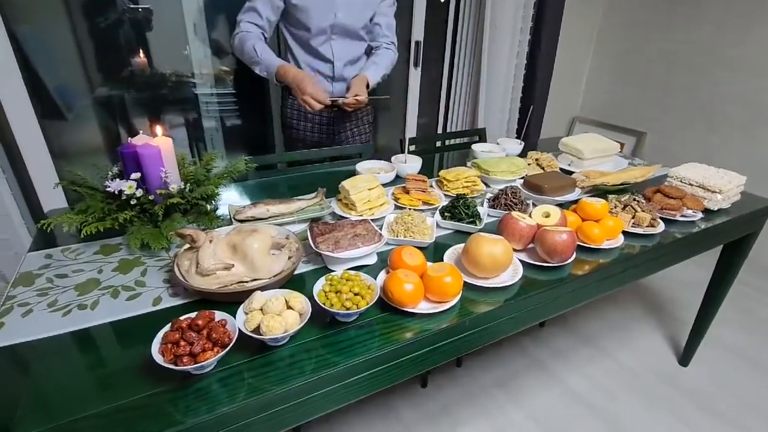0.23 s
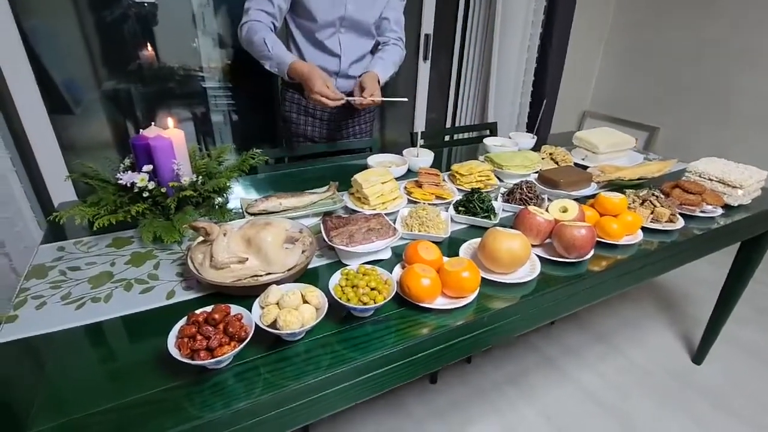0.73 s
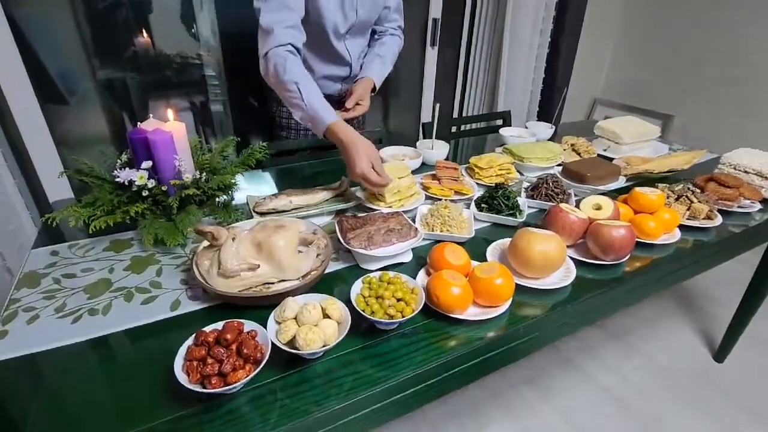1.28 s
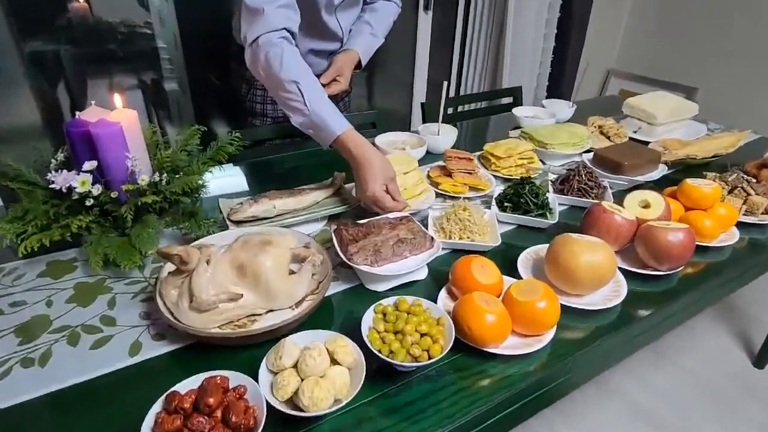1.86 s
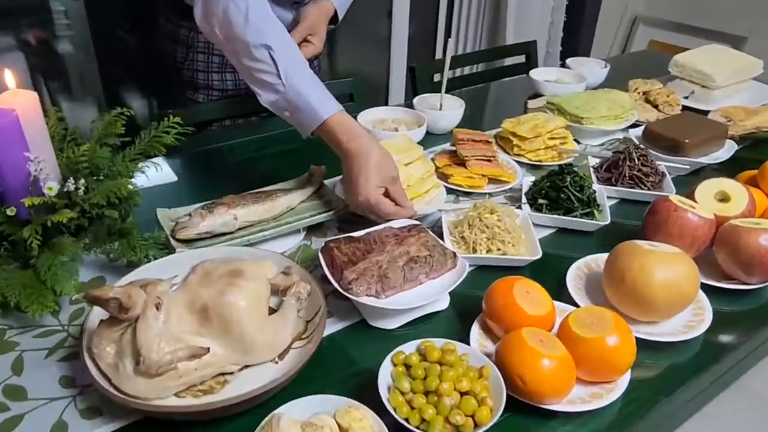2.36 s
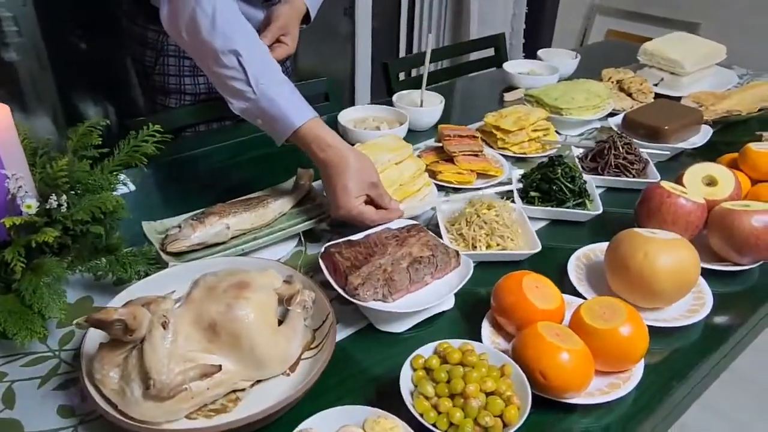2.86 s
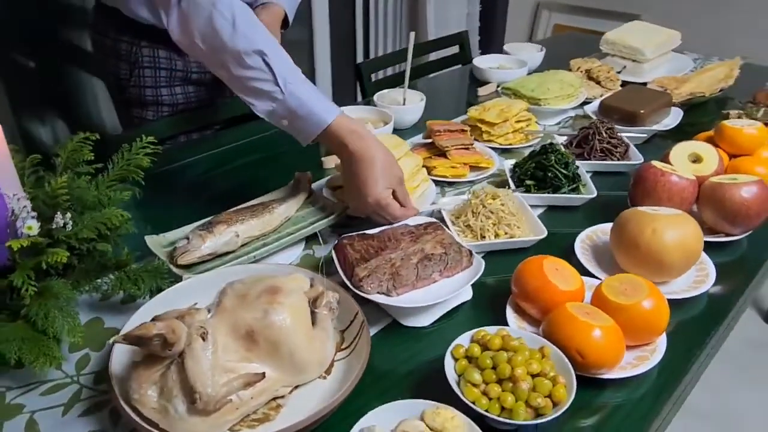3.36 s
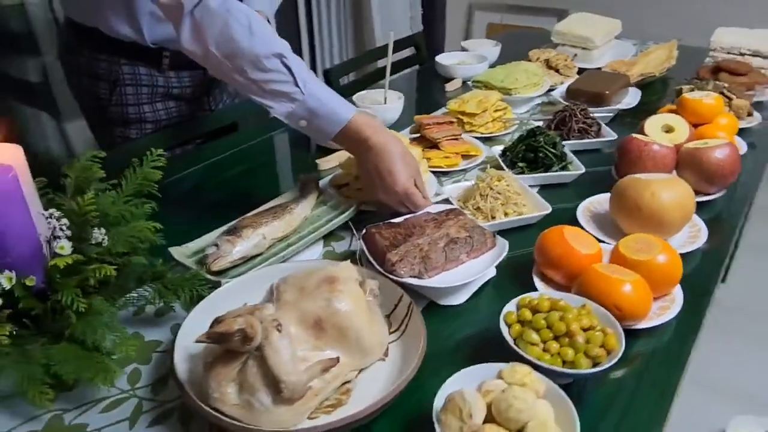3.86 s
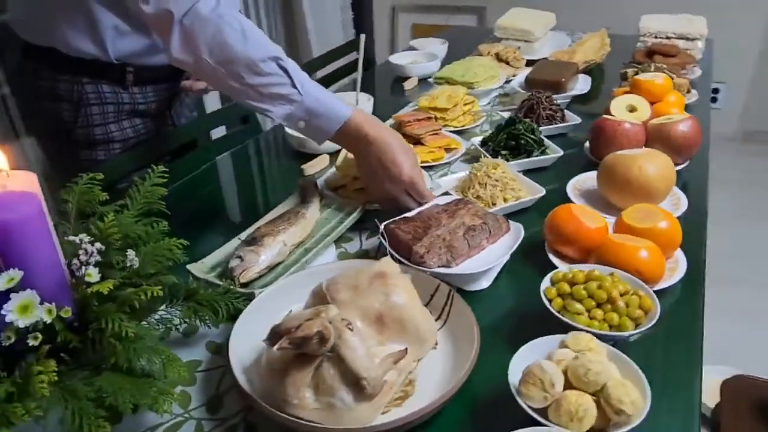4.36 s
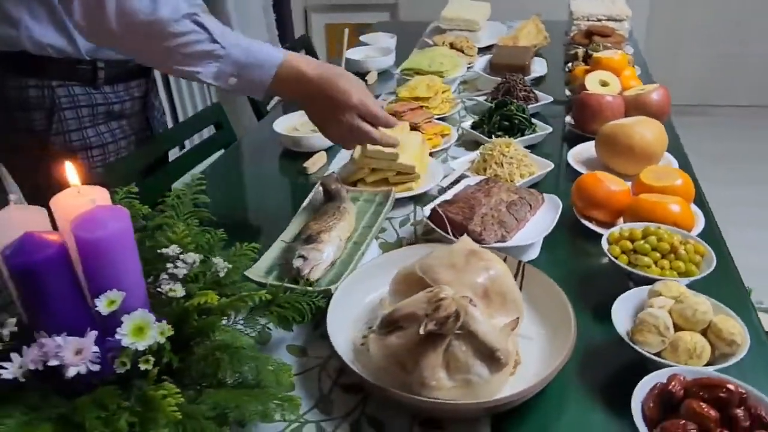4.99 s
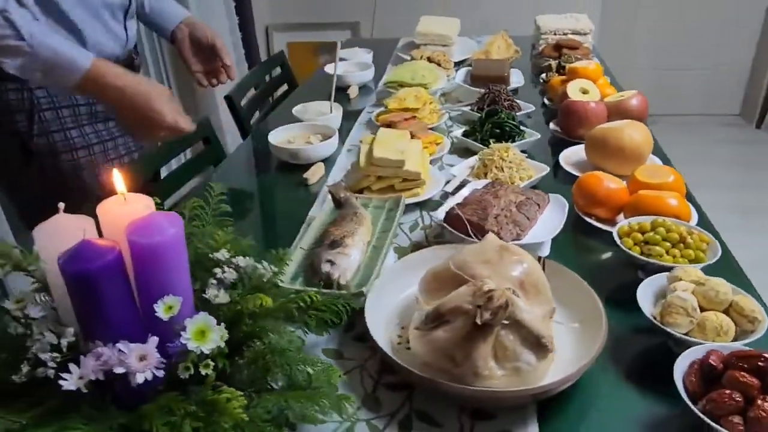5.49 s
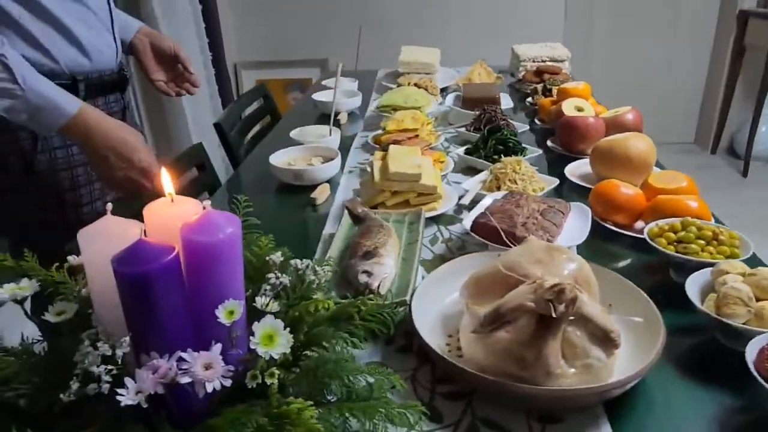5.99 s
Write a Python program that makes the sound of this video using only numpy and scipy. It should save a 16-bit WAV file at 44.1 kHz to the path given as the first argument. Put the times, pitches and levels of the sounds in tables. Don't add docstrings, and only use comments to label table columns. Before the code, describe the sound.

A quiet indoor room with low fridge hum, picked up by a hand-held phone about two metres from a table. Soft handling bumps and cloth swishes come first, then light chopstick clinks on china, one much louder clack with a quick rattle near three seconds, several smaller wooden taps and clinks, and finally rustling of sleeves and slippers.

```python
import sys
import numpy as np
from scipy import signal
from scipy.io import wavfile
from scipy.ndimage import uniform_filter1d, minimum_filter1d

SR = 44100
rng = np.random.default_rng(int(sys.argv[2]) if len(sys.argv) > 2 else 0)


def magnitude_from_level(level_db):
    exponent = np.asarray(level_db, float) / 20
    return 10 ** exponent


def dump_mix(stems):
    frames = np.atleast_2d(stems).T
    limited = np.clip(frames, -1, 1)
    pcm = np.round(limited * 32767).astype(np.int16)
    wavfile.write(sys.argv[1], SR, pcm)


N = 274743


def level(x, db):
    return x * magnitude_from_level(db) / np.sqrt(np.mean(x ** 2))


def band(x, lo_hz, hi_hz):
    return signal.sosfilt(signal.butter(2, [lo_hz, min(hi_hz, .45 * SR)], "band", fs=SR, output="sos"), x)


def on_log(table, hz):
    return np.interp(np.log(hz), np.log([row[0] for row in table]), [row[1] for row in table])


def walk(rate_hz):
    k = int(SR / rate_hz)
    x = np.repeat(rng.standard_normal(N // k + 1), k)
    x = uniform_filter1d(uniform_filter1d(x, k), k)[:N]
    return x / x.std()


def pan_gain(pan_db):
    return magnitude_from_level(np.array([[pan_db], [-pan_db]]) / 2)


def pair(hz, alike_hz, size=N):
    mid, side = rng.standard_normal((2, size))
    share = np.clip(hz / alike_hz, .21, 1)
    return (mid + share * side * np.array([[1], [-1]])) / np.sqrt(1 + share ** 2)


def ring(hz, db, t60_s, turn=0, start=0, rise_s=0.00056):
    t = np.arange(int((np.max(t60_s) + .02) * SR))[:, None] / SR
    decay = np.exp(-np.log(1000) * t / t60_s)
    fade = magnitude_from_level(db) * decay * (1 - np.exp(-t / rise_s))
    phase = 2 * np.pi * hz * t + start
    return np.array([np.sum(fade * np.sin(phase + side * turn), axis=1) for side in (.5, -.5)])


def add(out, start_s, x, pan_db):
    i = int(start_s * SR)
    x = x[:, :N - i] * pan_gain(pan_db)
    out[:, i:i + x.shape[1]] += x


def chatter(x, span_s, drop_db):
    when, weaker = rng.random((2, 7))
    push = np.zeros((1, int(span_s * SR) + 2))
    push[0, (when * span_s * SR).astype(int)] = magnitude_from_level(drop_db - 14 * when - 2 * weaker)
    push[0, 0] = 1
    return signal.fftconvolve(x, push)


# freq [Hz], density [dB per Hz]
AIR_TONE = [(15, -34), (25, -6), (59, -2.5), (82, -21), (113, -11.5), (267, -11), (340, -17.5),
            (523, -17.5), (2170, -24), (2630, -30), (4150, -31), (7500, -35.5), (15500, -50)]
# freq [Hz], level [dB], width [Hz]
CASE_DRONE = [(61, -73.5, 17), (343, -70.5, 64), (810, -92, 56.2), (2130, -78.5, 280)]


def air():
    tone, t = 0, np.arange(N) / SR
    for hz in 28 * 2 ** np.arange(0, 9.1, .5):
        db = on_log(AIR_TONE, hz) + 1.5 * walk(3)
        tone = tone + magnitude_from_level(db) * band(pair(hz, 1000), hz / 1.153, hz * 1.142)
    drone = 0
    for hz, level_db, width_hz in CASE_DRONE:
        drone = drone + level(band(pair(hz, 1050), hz - width_hz / 2, hz + width_hz / 2), level_db)
    hum_db, hum_hz = -61 + 1.8 * walk(8.8), 59.7
    hum = magnitude_from_level(hum_db) * np.sin(2 * np.pi * hum_hz * t + walk(2.72))
    return level(tone, -65) + drone + hum


# fastest_s [s], rise_s [s], fall_s [s], level_db [dB], bright_db [dB]
STROKES = [(0.03, .2, 0.7, -71.5, 1), (0.28, 0.033, 0.16, -71, -5.5), (0.385, .12, 0.06, -64.5, -1.5),
           (0.969, 0.21, 0.54, -72, 3.5), (1.3, 0.4, 1, -72, -3.5), (1.255, .03, 0.043, -71.5, 20),
           (5.09, 0.18, 0.31, -75.5, -4.5), (1.587, 0.091, .11, -53, 3.5), (2.12, 0.2, 0.13, -82.5, -16.5),
           (3.225, 0.21, 0.24, -67.5, -5), (3.61, 0.059, .12, -60.5, -2.5), (3.72, 0.16, 0.45, -70, -3),
           (3.97, 0.043, 0.057, -60.5, 1.5), (4.385, 0.029, 0.082, -61, 16), (4.427, 0.047, 0.077, -61, -6),
           (4.882, 0.095, 0.15, -60.5, 5), (4.938, .1, .11, -52, 14.5), (4.7, .1, 0.14, -74.5, -1.5),
           (5.374, 0.056, .1, -57.5, 1), (5.5, 0.23, 0.3, -68, -2.5), (5.63, 0.17, 0.16, -64.5, -5.5),
           (5.755, 0.058, 0.15, -62, 1.5), (5.98, 0.32, 0.24, -71.5, -4.5), (6.129, 0.058, .13, -48, 6.5)]


def swish():
    body_db, sizzle_db, sizzle_slope = 0.5, -4.5, 0.29
    curve = 1.39
    out, power, t = np.zeros((2, N)), np.zeros((3, N)), np.arange(N) / SR
    slips = magnitude_from_level(1.5 * rng.exponential(size=N) + 2.38 * walk(40))
    for fastest_s, rise_s, fall_s, level_db, bright_db in STROKES:
        near = slice(max(int((fastest_s - 2 * rise_s) * SR), 0), int((fastest_s + 2 * fall_s) * SR))
        after_s = t[near] - fastest_s
        away = np.where(after_s < 0, -after_s / rise_s, after_s / fall_s)
        tilt_db = np.array([[body_db - bright_db], [0], [sizzle_db + sizzle_slope * bright_db]])
        power[:, near] += magnitude_from_level(level_db + 1.0 + tilt_db - 20 * away ** curve) ** 2
    for (hz, k), gain in zip(((1400, 1.98), (4500, 1.85), (11000, 1.4)), np.sqrt(power)):
        out += level(band(pair(hz, 1670) * slips, hz / k, hz * k), 0) * gain
    return out * pan_gain(1.5)


# start_s [s], peak_db [dB], pitch_hz [Hz], t60_s [s], edge_db [dB]
FINGER_BUMPS = [(0.385, -31, 52, 0.011, -7), (0.631, -50, 61.6, 0.054, -20), (0.858, -49, 55.7, 0.16, -25),
                (0.927, -39.5, 65, 0.023, -30), (3.62, -77, 51.1, 0.07, -11), (3.65, -51.5, 64, 0.45, -14),
                (3.754, -41, 65, 0.04, -23), (4.771, -48.5, 64.5, 0.059, -5),
                (4.827, -47, 60.9, 0.14, -9.5), (5.374, -36, 53.8, 0.021, -29),
                (5.393, -39.5, 87, 0.06, -29), (5.657, -48, 64.5, 0.018, 1)]


def bumps():
    out = np.zeros((2, N))
    for start_s, peak_db, pitch_hz, t60_s, edge_db in FINGER_BUMPS:
        thump = ring(np.array([pitch_hz, 320]), peak_db + np.array([3, edge_db]), np.array([t60_s, .012]))
        add(out, start_s, thump, 0)
    return out


# start_s [s], peak_db [dB], pitch_hz [Hz], t60_s [s],
# pan_db [left minus right dB]
DRY_TICKS = [(0.625, -63, 450, 0.2, -1), (1.374, -40, 1640, 0.012, 9.5), (1.6604, -40, 1300, 0.0058, 7),
             (1.784, -42.5, 1700, 0.013, 12), (2.49, -62, 656, 0.087, .6), (2.575, -49, 334, 0.043, .6),
             (3.31, -50, 334, 0.057, 1), (3.483, -48, 336, 0.09, 2), (3.51, -52.5, 303, 0.088, .6),
             (4.279, -54, 330, 0.036, 3), (4.965, -61, 467, 0.09, 4), (5.3095, -49, 1660, 0.018, 7.5),
             (5.6442, -38, 1880, 0.0079, 11), (5.79, -60.5, 847, 0.09, 3)]


def ticks():
    out = np.zeros((2, N))
    for start_s, peak_db, pitch_hz, t60_s, pan_db in DRY_TICKS:
        tick = ring(pitch_hz * np.array([1, 1.25]), peak_db + np.array([3.5, -7]), t60_s)
        add(out, start_s, tick, pan_db)
    return out


# start_s [s], peak_db [dB], low_db, high_db, rebound_db [dB above peak]
CHINA_HITS = [(1.7245, -44, -11.5, 8.5, -28), (1.823, -56, -7, 11, 4), (1.8414, -37.5, -23, 9, -4.5),
              (1.8497, -35.5, 2, 9, -22), (1.914, -41, 4, 8, -31), (2.1271, -58.5, -10, -20, -1.5),
              (2.2578, -50, -3, -6, -14), (2.5566, -56, 2, -3.5, -11), (2.6412, -40, -11.5, 4.5, -20),
              (2.83, -52, -2.5, -3.5, -13.5), (2.97, -12.5, -25, 0, -15), (2.9864, -29, -1.5, 13.5, -4.5),
              (3.8173, -35, -11, -8, -25), (4.0544, -31, -7, 1, 1.5), (4.4227, -50.5, -14.5, -4, 0),
              (4.5471, -38, -10, -0.5, -7.5)]
PLATE_HZ = [3020, 3110, 3220, 3850, 4300, 4420, 4610, 4890, 5760, 5900, 6260, 6550, 7650, 8010, 8180, 8810,
            9480, 10450, 10900, 11300, 11850, 12320, 13300, 13620, 14380, 14850, 15050]
PLATE_DB = [7.5, -3, 8, -9, 4.5, -1.5, -15.5, -23, -7, -8, -12, -9, -5, -4, -9.5, -6.5, -3.5, -6.5, -7.5,
            -0.5, 0, -1.5, -6.5, -16, -12.5, -7.5, -9]
PLATE_EDGES_HZ = (3600, 5200, 10100)
TABLE_PAN_DB = 2


def clinks():
    out, hz = np.zeros((2, N)), np.array(PLATE_HZ)
    group = np.searchsorted(PLATE_EDGES_HZ, hz)
    for start_s, peak_db, low_db, high_db, rebound_db in CHINA_HITS:
        blend_odd, pitch_odd, turn_odd, phase_odd = rng.standard_normal((4, len(hz)))
        top_db = 1.24 * high_db - 7.5
        group_db = np.array([low_db, 0, high_db - 3, top_db - 3])[group]
        blend_db = peak_db - 1.5 + np.array(PLATE_DB) + group_db + 0.59 * blend_odd
        tone = ring(hz * (1 + 0.008 * pitch_odd), blend_db, t60_s=0.038, turn=1.54 * turn_odd,
                    start=np.pi * phase_odd, rise_s=.0011)
        add(out, start_s, chatter(tone, span_s=0.055, drop_db=rebound_db), TABLE_PAN_DB)
    return out


# pitch_hz [Hz], level_db [dB], t60_s [s]
WOOD_MODES = [(580, 7, 0.011), (734, -25, 0.023), (801, 2.5, 0.019), (935, -12, 0.014),
              (1140, 11.5, 0.0074), (1430, 1, 0.029), (1695, 10, 0.0035), (2072, 6, 0.025),
              (2259, 2.5, 0.028), (2678, 11.5, 0.0037), (3150, -4, 0.0069)]


def wood_blow(peak_db, best_hz, crack_db, rebound_db):
    hz, mode_db, t60_s = np.transpose(WOOD_MODES)
    pitch_odd, turn_odd, phase_odd = rng.standard_normal((3, len(hz)))
    blend_db = peak_db - 2.5 + mode_db - 7 * np.abs(np.log2(hz / best_hz))
    tone = ring(hz * (1 + 0.038 * pitch_odd), blend_db, t60_s, turn=turn_odd * hz / 2500,
                start=np.pi * phase_odd, rise_s=0.00038)
    crack = band(pair(6000, 4000, size=800), 1200, 7000) * np.exp(-np.arange(800) / (0.009 * SR))
    tone[:, :800] += crack * magnitude_from_level(peak_db + crack_db)
    return chatter(tone, span_s=.05, drop_db=rebound_db)


# start_s [s], peak_db [dB], best_hz [Hz], crack_db, rebound_db [dB above peak]
HARD_KNOCKS = [(1.725, -44.5, 1000, -1, -13), (1.841, -47, 960, -4, 3), (1.85, -38.5, 2130, 5, -25),
               (1.916, -40.5, 900, 6, -19), (2.259, -56.5, 830, 8.5, -28), (2.613, -47, 1470, -4.5, -6),
               (2.639, -51.5, 1010, 10.5, -15), (2.97, -22.5, 1070, 1, -8), (3.015, -27.5, 1430, 6, -17),
               (3.483, -34, 637, -8, -25.5), (3.816, -38, 560, 4, -12.5), (4.052, -36.5, 810, 9.5, 3.5),
               (4.063, -40, 765, 8, -2.5), (4.545, -43.5, 1140, 0, -2), (4.574, -45, 1220, 0.5, -5)]


def knocks():
    out = np.zeros((2, N))
    for start_s, peak_db, best_hz, crack_db, rebound_db in HARD_KNOCKS:
        add(out, start_s, wood_blow(peak_db, best_hz, crack_db, rebound_db), TABLE_PAN_DB)
    return out


# start_s [s], level_db [dB]
HAND_THUDS = [(1.725, -60.5), (1.841, -50.5), (1.917, -59.5), (1.963, -63), (2.64, -62), (2.97, -40.5),
              (3.016, -46.5), (3.37, -67), (3.483, -56.5), (3.816, -65), (4.038, -50.5), (4.277, -66),
              (4.475, -63.5), (4.543, -56)]
# pitch_hz [Hz], level_db [dB], t60_s [s]
TABLE_MODES = [(146.5, 5.5, 0.15), (173.3, 9.5, 0.12), (208.4, -2, 0.42), (318, -4, 0.039)]


def thuds():
    out = np.zeros((2, N))
    hz, mode_db, t60_s = np.transpose(TABLE_MODES)
    for start_s, level_db in HAND_THUDS:
        add(out, start_s, ring(hz, level_db - 6 + mode_db, t60_s, rise_s=0.0088), 0)
    return out


# start_s [s], peak_db [dB], best_hz [Hz]
SOFT_TAPS = [(1.963, -45.5, 560), (2.492, -64, 650), (2.572, -48.5, 1300), (2.714, -55.5, 795),
             (2.986, -29.5, 1000), (3.308, -53, 619), (3.371, -51.5, 900), (3.789, -46.5, 1430),
             (3.884, -42.5, 570), (4.038, -47, 1020), (4.278, -49.5, 635), (4.405, -50.5, 1380),
             (4.475, -41.5, 550)]


def taps():
    out = np.zeros((2, N))
    for start_s, peak_db, best_hz in SOFT_TAPS:
        add(out, start_s, wood_blow(peak_db, best_hz, crack_db=-12, rebound_db=-10), TABLE_PAN_DB)
    return out


# start_s [s], peak_db [dB], middle_hz [Hz], pan_db [left minus right dB]
WIDE_SNAPS = [
    (4.5679, -30.5, 10900, 1),
    (4.6429, -33.5, 6100, 3),
    (5.066, -44, 6700, -1),
]


def snaps():
    out = np.zeros((2, N))
    for start_s, peak_db, middle_hz, pan_db in WIDE_SNAPS:
        click = pair(middle_hz, 9000, size=400) * np.exp(-np.arange(400) / (0.002 * SR))
        add(out, start_s, band(click, middle_hz / 1.9, middle_hz * 1.18) * magnitude_from_level(peak_db + 1.0), pan_db)
    return out


# freq [Hz], t60 [s]
DECAY_T60 = [(150, 0.61), (600, 0.36), (2000, 0.37), (5000, 0.2), (14000, 0.25)]


def echoes(wet_db, build_s):
    t, tail = np.arange(SR // 2) / SR, 0
    for hz in 60 * 2. ** np.arange(9):
        octave = band(pair(hz, 1300, size=len(t)), hz / np.sqrt(2), hz * np.sqrt(2))
        tail = tail + octave * np.exp(-np.log(1000) * t / on_log(DECAY_T60, hz))
    tail = tail * (1 - np.exp(-(t / build_s) ** 2))
    return tail * magnitude_from_level(wet_db) / np.sqrt(np.sum(tail ** 2) / 2)


def room(x, wet_db, build_s):
    out, step = np.zeros((2, N)), 2 * SR // 5
    for i in range(0, N, step):
        mono = x[:, i:i + step].mean(axis=0, keepdims=True)
        add(out, (i + .5) / SR, signal.fftconvolve(mono, echoes(wet_db, build_s)), 0)
    return out


def scene():
    table = clinks() + knocks() + thuds() + taps()
    near = bumps() + ticks() + snaps()
    wet = room(table + magnitude_from_level(-14.0) * near, wet_db=1.5, build_s=.007)
    return table + wet + near + swish() + air()


def smear(x, noise_db, mask_db):
    window = np.sin(np.pi * (np.arange(2048) + .5) / 2048)
    shape = dict(window=window, nperseg=2048, noverlap=1024)
    spec = signal.stft(np.pad(x, ((0, 0), (76, 0))), **shape)[2]
    spec = spec * (1 + magnitude_from_level(noise_db) * np.exp(2j * np.pi * rng.random(spec.shape)))
    power = np.mean(np.abs(spec[:, :1024].reshape(2, 64, 16, -1)) ** 2, axis=2)
    loudest = -minimum_filter1d(-power, size=9, axis=1)
    weak = (power < loudest * magnitude_from_level(2 * mask_db)) & (np.arange(64) > 6)[:, None]
    spec[:, :1024] *= np.where(np.repeat(weak, 16, axis=1), .05, 1)
    return signal.istft(spec, **shape)[1][:, 76:76 + N]


def low_pass(x):
    return signal.sosfilt(signal.butter(12, 16310, fs=SR, output="sos"), x)


def record(dry):
    top_cut = signal.ellip(10, .2, 80, 15450, fs=SR, output="sos")
    mix = smear(signal.sosfilt(top_cut, dry), noise_db=-9.5, mask_db=-17)
    return low_pass(mix)


dry = scene()
out = record(dry)
dump_mix(out)
```